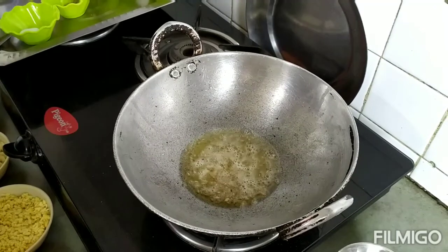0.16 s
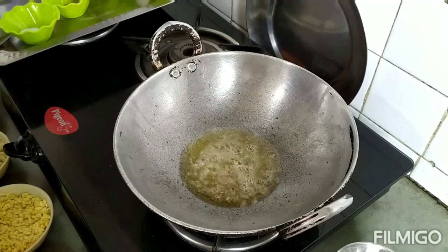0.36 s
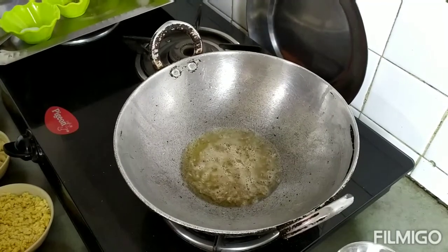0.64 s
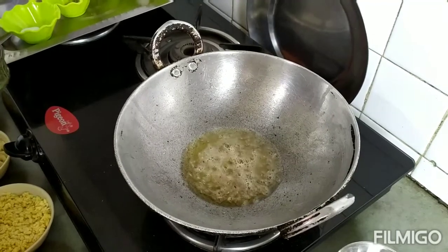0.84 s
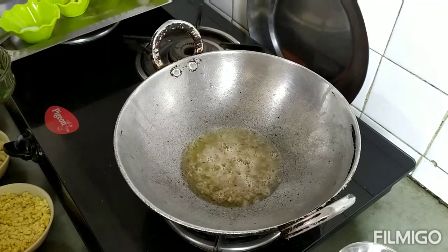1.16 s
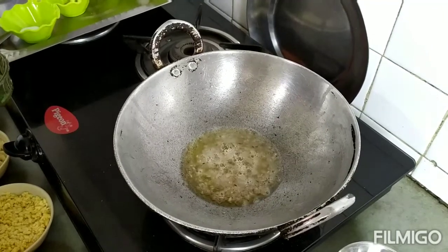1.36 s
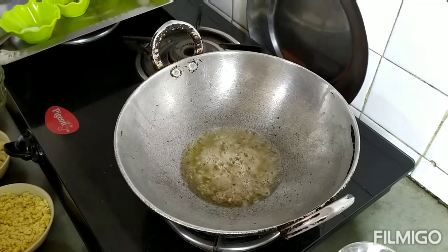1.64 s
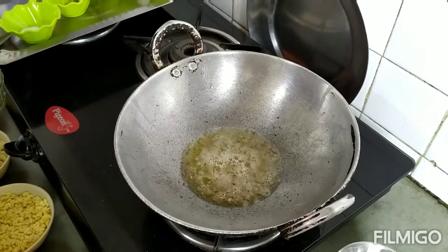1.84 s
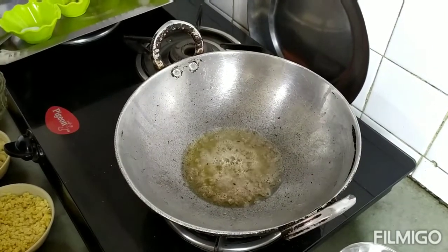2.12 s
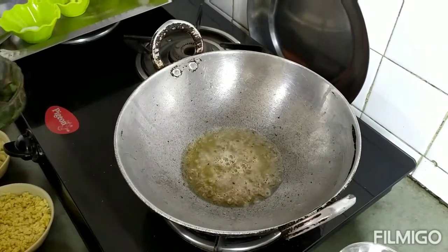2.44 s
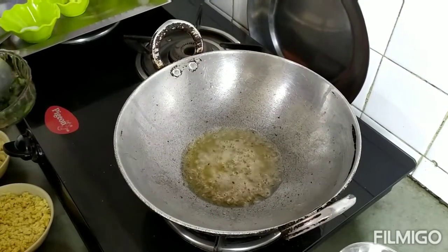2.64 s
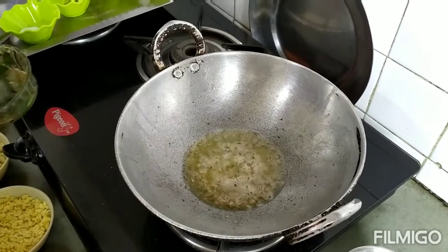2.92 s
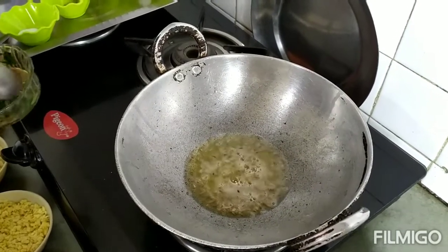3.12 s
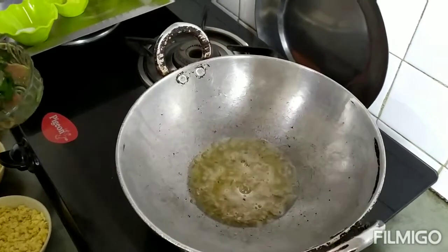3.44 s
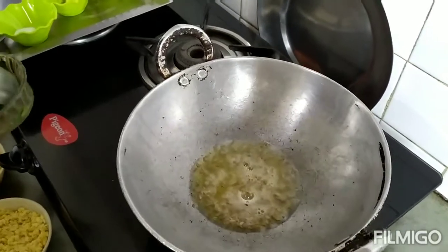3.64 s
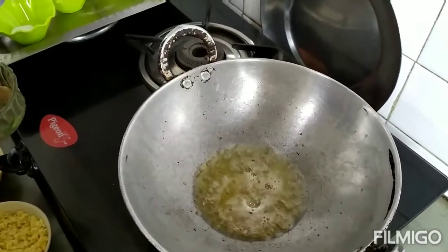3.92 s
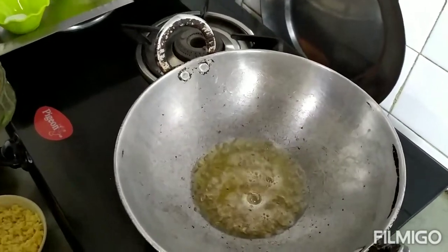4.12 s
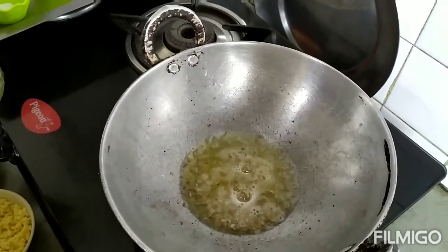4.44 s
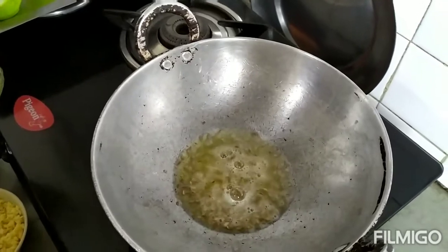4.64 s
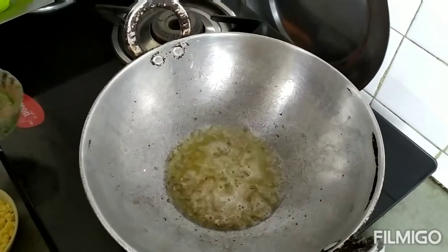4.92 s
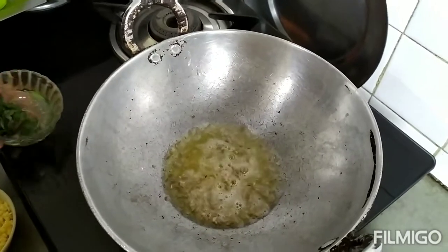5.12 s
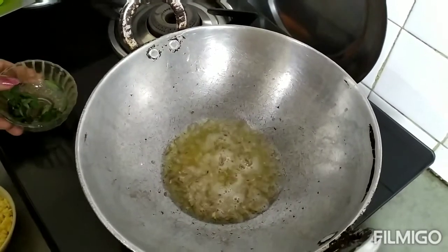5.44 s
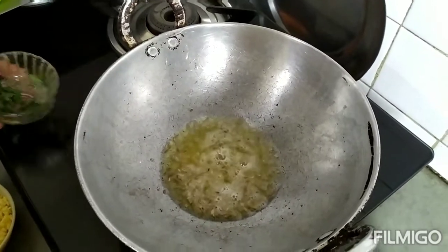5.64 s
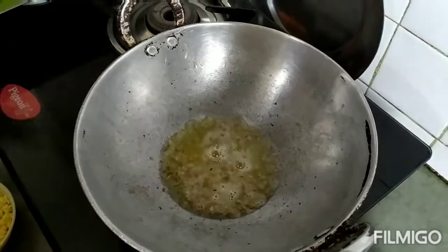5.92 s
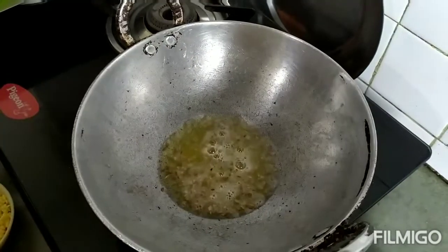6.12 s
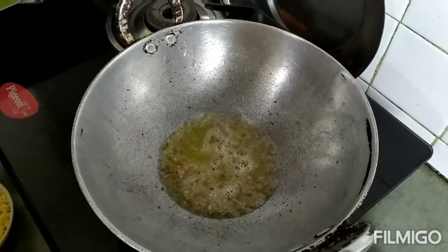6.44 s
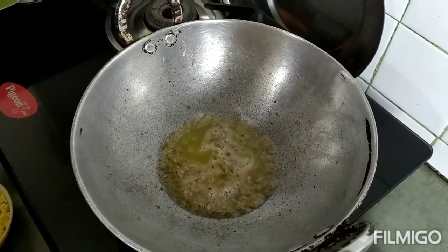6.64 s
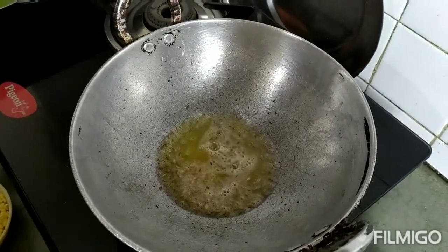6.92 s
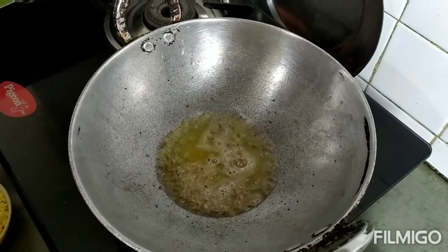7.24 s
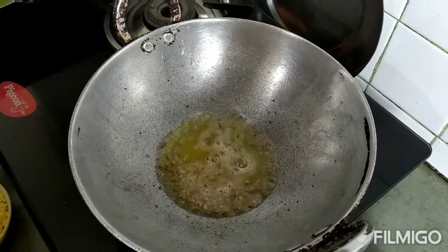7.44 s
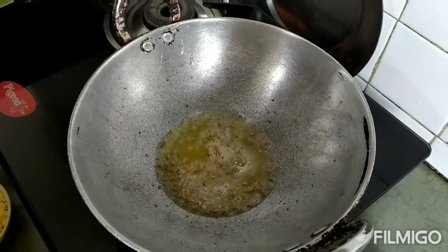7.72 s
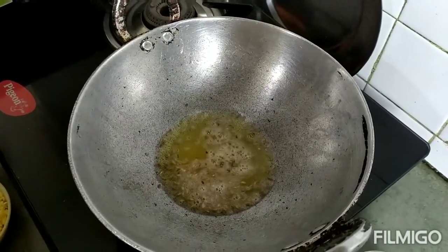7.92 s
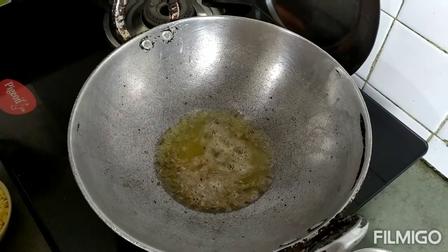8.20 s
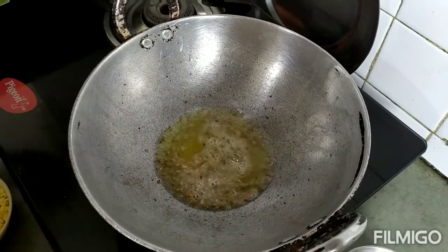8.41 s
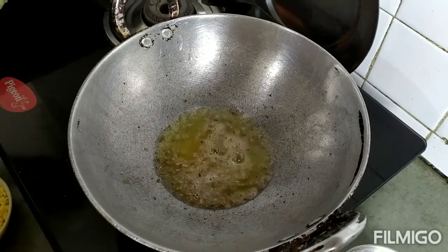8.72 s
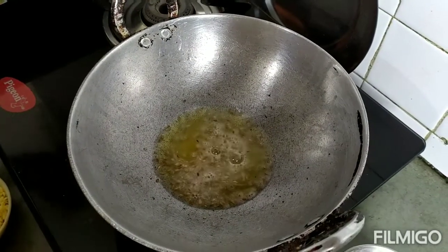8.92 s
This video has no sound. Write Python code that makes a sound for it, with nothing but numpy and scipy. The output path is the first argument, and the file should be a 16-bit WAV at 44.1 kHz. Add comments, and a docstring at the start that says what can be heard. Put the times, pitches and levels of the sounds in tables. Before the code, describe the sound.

A fine, high fizz of hot oil in a metal wok runs for about nine seconds, heard from just above the pan in a tiled kitchen, over the low drone of a gas burner. Mustard seeds burst in sharp, irregular pops with a slight metallic ring, among faint crackles and spitting droplets. The strongest pops come near 1.9, 3.8, 4.3, 5.0, 6.7, 8.2 and 8.7 seconds, the loudest at 5.4. Between 2.9 and 4.7 seconds a glass bowl gives several short, damped clinks as it is picked up, clearest at 3.3, 4.1 and 4.7. Coarser bubbling builds at around 4 seconds. From 6.6 to 7 seconds a drawer further off scrapes and runs into its stop. A faint, breathy steam whistle follows from 7.8 to about 8.5 seconds. Soft dull knocks and finger rubs occur close to the microphone, mostly after 3.4 seconds.

```python
"""A fine fizz of hot oil, broken by sharp pops: mustard seeds fry in a metal wok in a tiled kitchen.
Each husk that tears is an impulse exciting the air and metal of the wok; the fizz is the sum of
countless collapsing bubbles, and one seed whistles with steam. A glass bowl clinks in its damped
modes as it is picked up, and a drawer is pulled further off. Close by there are dull knocks and
fingers rub on a hand-held case; under it all lies the low drone of the gas burner."""
import sys
import numpy as np
from scipy import signal
from scipy.fft import rfft, irfft, next_fast_len
from scipy.io import wavfile

SR = 44100
rng = np.random.default_rng(int(sys.argv[2]) if len(sys.argv) > 2 else 0)


def wav_record(signal):
    """Record a signal, one row per channel, as 16-bit PCM in the file named by sys.argv[1]."""
    frames = np.transpose(np.atleast_2d(signal))
    bounded = np.clip(frames, -1, 1)
    # unit amplitude maps onto the largest positive 16-bit level
    quanta = np.round(bounded * 32767).astype(np.int16)
    wavfile.write(sys.argv[1], SR, quanta)


N = 399987
TIME = np.arange(N) / SR
AGE = TIME[:SR * 3 // 5]   # t/s since an excitation


# bursting seeds: t/s, relative level/dB, snap f/Hz, relative cavity level/dB, relative crack level/dB,
# left-right/dB, wok ring re pop/dB, snap tilt/(dB per octave)
SEED_BURSTS = [(0.0726, -40.5, 3050, -21, -15, 3, -19, 4), (1.091, -49.5, 3200, -47, -16, -6, -38, 5),
               (1.9449, -19, 3280, -29.5, -18, -1, -22.5, 1),
               (2.177, -32.5, 2960, -23, -14, -2.5, -10.5, 3.5), (2.838, -46, 2980, -11.5, -20, -7, -8, 9),
               (2.858, -47.5, 2780, -10, -23, -2, 2, 7), (2.879, -51.5, 2350, -19, -12, -1, -6, 7),
               (2.907, -51.5, 2520, -10, -12, -7, -13, 9), (3.7488, -46, 2900, -18, -18, -4, -5, -12),
               (3.8103, -22.5, 2480, -35.5, -12.5, -0.5, -26, -1.5),
               (4.2959, -21, 2650, -17, -15.5, 0.5, -9, 0.5), (4.4896, -32.5, 2540, -22, -14, -1, -11, 5),
               (4.9946, -21, 3340, -30, -14, 2, -26, 2), (5.3988, -10, 3015, -27, -18, 5, -19, 3.5),
               (5.639, -29.5, 3200, -26.5, -18.5, 6, -18, 2), (6.745, -17, 3200, -33, -19.5, 0.5, -16.5, 4),
               (7.5194, -36.5, 3200, -23.5, -13, 1, -5, 3), (7.5677, -36, 2760, -23.5, -32, 5, -8.5, 2.5),
               (8.205, -18, 2900, -18, -19.5, 1.5, -13, 0), (8.693, -23.5, 3000, -22, -25, 2, -17, -1.5)]
# modes of the snap: ratio to snap f, bandwidth/Hz, level/dB
SNAP_MODES = [(0.559, 380, -9), (0.816, 380, -0.5), (1.001, 350, 0), (1.22, 450, 1), (1.5, 650, -1.5)]
# modes of the air in the wok: f/Hz, bandwidth/Hz, level/dB
CAVITY_MODES = [(820, 120, -7), (998, 270, 19.5), (1540, 160, 5)]
# modes of the cracking husk: f/Hz, bandwidth/Hz, level/dB
CRACK_MODES = [(5480, 2600, 3), (8700, 3800, -1.5), (11400, 2000, -15)]

def seed_pops(gain_db, cavity_gain_db, crack_gain_db, tear_s):
    """Impulse excitation: a husk tears with a snap and a crack, and the wok's air and metal resonate."""
    out = np.zeros((2, N))
    opening = 1 - np.exp(-(AGE[:SR // 20] / tear_s) ** 2)
    for s, db, hz, cavity_db, crack_db, pan_db, wok_db, tilt_db in SEED_BURSTS:
        modes = [(ratio * hz, width, mode_db + tilt_db * np.log2(ratio))
                 for ratio, width, mode_db in SNAP_MODES]
        snap = unit_energy(band(opening * struck(modes, scatter_db=1.5), 1450, 5300))
        cavity = unit_energy(band(struck(CAVITY_MODES, scatter_db=2.0), 720, 2600)) * panned(-2.5)
        crack = unit_energy(band(struck(CRACK_MODES, scatter_db=2.5), 3300, 12000)) * panned(-4.0)
        crack = np.roll(crack, int(tear_s * SR), axis=1)
        pop = snap * panned(pan_db) + from_db(cavity_db + cavity_gain_db) * cavity
        pop += from_db(crack_db + crack_gain_db) * crack
        pop[0] = np.roll(pop[0], 3)   # the sound reaches the left a little later
        add(out, s, from_db(db + gain_db) * in_kitchen(reflected(pop), near_db=-6.5, room_db=-0.85))
        add(out, s, from_db(db + gain_db + wok_db) * wok_ring())
    return out


# modes of the wok's metal: f/Hz, level/dB, T60/s
WOK_MODES = [(964, -3.5, 0.25), (1005, -1, 0.25), (1076, -3, 0.32), (1155, -2.5, .27), (1750, -9.5, .2),
             (2030, -8.5, 0.26), (2400, -5.5, 0.2), (2570, 2, 0.26), (2600, -1.5, 0.26), (2900, -1, .25),
             (3090, 0, 0.21), (3225, 1, 0.3), (3450, -3, 0.28), (3950, -4, 0.23), (4600, -6.5, .26)]

def wok_ring():
    """Modal superposition: each pop excites the metal's modes with strengths of its own; energy 1."""
    hz, db, t60 = np.transpose(WOK_MODES)[:, :, None]
    waves = from_db(db - 60 * AGE / t60) * np.sin(2 * np.pi * hz * AGE)
    return unit_energy(rng.standard_normal((2, len(WOK_MODES))) @ waves)


# first echoes of a pop: mean delay/s, level re direct sound/dB
EARLY_ECHOES = [(0.0013, -7.5), (0.0023, -10), (0.0074, -16)]

def reflected(sound):
    """Early reflections: their path lengths differ with the place of the seed."""
    response = np.zeros((2, SR // 20))
    response[:, 0] = 1
    for delay_s, db in EARLY_ECHOES:
        delays = (delay_s * SR * rng.uniform(.85, 1.15, 2)).astype(int)
        response[[0, 1], delays] += from_db(db)
    return signal.fftconvolve(sound, unit_energy(response), axes=1)


# coarse bubbling, growing as the oil heats and the listener comes closer: t/s, level/dB
VIGOUR_CURVE = [(0, -78), (1.7, -77.5), (3.7, -67.5), (4.4, -59.5), (5.4, -61), (6.0, -64.5), (7.5, -65),
                (8.3, -62), (9.07, -63)]
# spectra of fine fizz and coarse bubbling: f/Hz, spectral density level/dB
FIZZ_SPECTRUM = [(2800, -23), (3300, -9), (4300, -2.5), (5300, -11.5), (5950, -1.5), (6470, -0.5),
                 (7600, 0.5), (8300, 4), (9780, 4.5), (11400, 0.5), (13000, -1), (13500, -18),
                 (14300, -20.5), (15000, -31.5)]
BUBBLING_SPECTRUM = [(2350, -28), (2550, -14.5), (2800, -8), (3100, -2.5), (3900, -2), (5000, -3),
                     (6000, -8.5), (9000, -33)]

def frying(mean_fizz_db, fizz_follows, fizz_pan_db, bubbling_pan_db):
    """Incoherent sources add: bubbles collapse in patches of foam, as fine fizz and coarse bubbling."""
    bubbling_db = in_time(VIGOUR_CURVE)
    fizz_db = mean_fizz_db + fizz_follows * (bubbling_db - bubbling_db.mean())
    fizz = click_rain(FIZZ_SPECTRUM, per_s=12000, spread_db=2.35, flutter_db=2.5, patches=6)
    bubbling = click_rain(BUBBLING_SPECTRUM, per_s=2500, spread_db=3.1, flutter_db=5, patches=4)
    return (from_db(fizz_db) * panned(fizz_pan_db) * fizz
            + from_db(bubbling_db) * panned(bubbling_pan_db) * bubbling)


def click_rain(spectrum, per_s, spread_db, flutter_db, patches):
    """Shot noise: dense, uneven clicks from several patches, each with its own flutter and echoes."""
    sizes = from_db(spread_db * np.minimum(rng.exponential(1, (2, N)), 5))
    onsets = rng.random((2, N)) < per_s / SR
    clicks = stereo(onsets * sizes * rng.choice([-1, 1], (2, N)), side_db=-1.5)
    patch = rng.integers(0, patches, N)
    out = np.zeros((2, N))
    for k in range(patches):
        echoes = 1.2 * unit_energy(noise(SR // 50) * np.exp(-AGE[:SR // 50] / 0.0034))
        echoes[:, 0] += 1
        fluttering = clicks * (patch == k) * surge(per_s=22, depth_db=flutter_db)
        out += signal.oaconvolve(fluttering, echoes, axes=1)[:, :N]
    return coloured(out, spectrum)


# spitting droplets: t/s, relative level/dB, left-right/dB
DROPLET_BURSTS = [(1.018, -44, 0), (1.073, -42, -9), (3.7497, -35, -5), (3.9715, -40, -2), (4.842, -53, 1),
                  (5.582, -43, -12), (5.843, -44, -8), (6.126, -38.5, 2), (6.8327, -27.5, -9),
                  (7.64, -52, 1)]
# modes of a thin tick, for droplets and husks: f/Hz, bandwidth/Hz, level/dB
TICK_MODES = [(4200, 2500, -8), (8500, 3000, -1), (12000, 2500, -2)]

def droplet_spits(gain_db):
    """Impulses in a reverberant field: water bursts out of the oil, heard largely through echoes."""
    out = np.zeros((2, N))
    for s, db, pan_db in DROPLET_BURSTS:
        tick = unit_peak(band(struck(TICK_MODES, scatter_db=2.0), 4000, 14000))
        tick *= from_db(db + gain_db) * panned(pan_db)
        add(out, s, in_kitchen(tick, near_db=4, room_db=6.0))
    return out


def husk_crackle(per_s, gain_db, spread_db, follows):
    """A random impulse train: husks that only crack tick faintly, more strongly as the oil heats."""
    out = np.zeros((2, N))
    for when, weakness, pitch, side in rng.random((int(per_s * N / SR), 4)):
        tick = struck(np.array(TICK_MODES) * [.7 + .4 * pitch, .5, 1], scatter_db=2.0)
        add(out, when * N / SR, from_db(gain_db - spread_db * weakness) * panned(8 * side - 6) * tick)
    vigour_db = in_time(VIGOUR_CURVE)
    out *= from_db(follows * (vigour_db - vigour_db.max()))
    return in_kitchen(band(out, 3200, 12500, order=5), near_db=9.0, room_db=4.5)[:, :N]


# resonances of a leaking seed: f/Hz, bandwidth/Hz, level/dB
WHISTLE_MODES = [(3510, 12, 0), (3690, 30, -10), (3870, 40, -2.5), (4020, 30, -8)]

def steam_whistle(start_s, length_s, gain_db):
    """Noise-driven resonance: one jet of steam leaks from a seed with a faint, breathy whistle."""
    hz, width, db = np.transpose(WHISTLE_MODES)[:, :, None]
    resonances = from_db(db) * unit_energy(np.exp(-np.pi * width * AGE) * np.cos(2 * np.pi * hz * AGE))
    tones = signal.fftconvolve(noise(), unit_energy(resonances.sum(axis=0))[None], axes=1)
    jet = envelope(start_s, length_s, attack_s=0.26, fade_db_per_s=36)
    return from_db(gain_db) * jet * band(tones[:, :N], 2900, 4630)


# contacts with the bowl: t/s, relative level/dB, tilt/(dB per octave), chatter time/s,
# first and second f/Hz favoured by the place of contact, their boost/dB, free ring/dB
BOWL_CONTACTS = [(2.882, -44.5, 3.5, 0.0085, 2570, 6300, 16, 0), (3.303, -24, 0, 0.007, 2570, 4000, 4, -12),
                 (3.352, -39, 5, 0.009, 11000, 13000, 5, -6), (3.469, -51, -0.5, 0.006, 2570, 6470, 21, 11),
                 (4.141, -21, 3, 0.005, 6300, 12620, 4.5, -4),
                 (4.681, -26.5, 1.5, 0.0082, 4270, 12770, 9.5, -7)]
# modes of the glass: f/Hz, hand-damped bandwidth/Hz, damped level/dB, free level/dB
GLASS_MODES = [(1700, 240, -12, -39), (2523, 90, 0, -9.5), (2650, 130, -2, -11), (3370, 320, -10, -17),
               (3650, 280, -12, -28), (4000, 300, -6, -31), (6135, 170, -5.5, -17.5),
               (6300, 200, -1.5, -18.5), (6410, 170, -1, -10), (7700, 400, -20.5, -25.5),
               (8440, 260, -7, -20.5), (8930, 300, -7.5, -18), (10300, 300, -10, -17),
               (10920, 260, -0.5, -23), (12100, 150, -9, -28), (12620, 100, -5.5, -26),
               (13500, 120, -2, -24), (14440, 220, -7, -25), (15650, 260, -21, -38)]
# rattle of the contacts: f/Hz, spectral density level/dB
RATTLE_SPECTRUM = [(1100, -11.5), (2400, -2), (3800, 3.5), (4900, -9), (6200, 2), (9000, 0.5), (13500, 2),
                   (14600, -9), (15500, -26)]

def bowl_clinks(gain_db, free_gain_db, t60_at_6khz_s, rattle_db, pan_db, treble_pan_db):
    """Modal damping: the hand stops most of the chattering bowl's ring; a little sings on unsteadily."""
    out = np.zeros((2, N))
    hz, width, damped_db, sustain_db = np.transpose(GLASS_MODES)[:, :, None]
    octaves = np.log2(hz / 6000)
    t60 = t60_at_6khz_s * 2 ** (-0.87 * octaves)   # higher modes die sooner
    damped = unit_energy(np.exp(-np.pi * width * AGE))
    sustained = from_db(sustain_db + free_gain_db) * unit_energy(from_db(-60 * AGE / t60))
    sides = from_db(np.array([1, -1])[:, None, None] * (pan_db + treble_pan_db * octaves) / 2)
    for s, db, tilt_db, chatter_s, first_hz, second_hz, boost_db, free_db in BOWL_CONTACTS:
        chatter = np.exp(-(AGE[:SR // 50] / chatter_s) ** 2)[None]   # contacts draw out the attack
        swell = unit_energy(signal.fftconvolve(damped, chatter, axes=1)[:, :len(AGE)])
        free = from_db(free_db) * sustained * (1 - np.exp(-AGE / chatter_s))
        favoured = np.exp(-((hz - first_hz) / 300) ** 2) + np.exp(-((hz - second_hz) / 300) ** 2)
        decay = (from_db(damped_db) * swell + free) * from_db(tilt_db * octaves + boost_db * favoured)
        unsteady = np.array([surge(160, 3.5, len(AGE)) * surge(28, 3, len(AGE)) for _ in GLASS_MODES])
        waves = np.sin(2 * np.pi * (hz * AGE + rng.random((2, len(GLASS_MODES), 1))))
        ring = np.sum(sides * unsteady * decay * waves, axis=1)
        ring /= np.sqrt(np.sum(ring ** 2) / 2)
        rattle = unit_energy(coloured(noise(len(AGE)), RATTLE_SPECTRUM) * swell[0])
        clink = ring + from_db(rattle_db) * rattle * panned(pan_db)
        add(out, s - .002, from_db(db + gain_db) * in_kitchen(clink, near_db=-2.0, room_db=1.0))
    return out


# short scrapes of the drawer: t/s, relative level/dB, duration/s
DRAWER_STROKES = [(6.593, -26, 0.033), (6.922, -34.5, 0.024), (6.939, -27, 0.047)]
# their spectrum: f/Hz, spectral density level/dB
SCRAPE_SPECTRUM = [(120, -46), (200, -30), (252, -5), (306, -18), (360, -3), (541, -20), (646, 4),
                   (922, -3.5), (1140, 0), (1460, -14.5), (1950, 0.5), (4180, -4), (6290, -16),
                   (9640, -13.5), (14000, -31.5)]

def drawer_scrapes(gain_db, room_db):
    """Sliding friction: a drawer further off scrapes roughly, heard mostly as reverberation."""
    out = np.zeros((2, N))
    for s, db, length in DRAWER_STROKES:
        stroke = np.clip(AGE / 0.0032, 0, 1) * np.exp(-(AGE / length) ** 4)
        friction = coloured(stereo(noise(len(AGE)), side_db=-4.0), SCRAPE_SPECTRUM)
        scrape = friction * stroke * surge(per_s=310, depth_db=2.5, size=len(AGE))
        add(out, s, from_db(db + gain_db) * in_kitchen(scrape, near_db=2, room_db=room_db))
    return out


# hollow body of the drawer: f/Hz, spectral density level/dB
DRAWER_SPECTRUM = [(280, -12.5), (350, -17), (440, -7), (560, -13), (650, -0.5), (800, -1), (950, -13),
                   (1200, -17.5), (1700, -9.5)]

def drawer_slide(pull_s, pull_db, coast_db_per_s, stop_s, stop_db):
    """Forced vibration: the jerked drawer hums, coasts ever more quietly and runs into its stop."""
    edges = dict(attack_s=0.033, fade_db_per_s=179)
    coasting = from_db(pull_db - coast_db_per_s * np.maximum(TIME - pull_s, 0))
    run = coasting * envelope(pull_s, stop_s - pull_s, **edges)
    stop = from_db(stop_db) * envelope(stop_s, length_s=0.067, **edges)
    return (run + stop) * coloured(stereo(noise(), side_db=-8.5), DRAWER_SPECTRUM)


# dull knocks: t/s, relative level/dB, nominal f/Hz, thump re knock/dB, scuff re knock/dB
DULL_KNOCKS = [(0.282, -61, 400, -10, -27), (3.44, -55, 433, -6, -24), (4.68, -50, 407, -6, 11),
               (5.028, -47.5, 400, -12, -11), (5.562, -40.5, 445, 0.5, 3), (6.337, -44.5, 420, -6, -12),
               (7.355, -54, 450, -17, -7), (7.732, -53.5, 444, -5, -15), (7.785, -52, 523, -15, -12),
               (7.918, -48, 340, -14, -23), (8.105, -47, 463, -7, -16), (8.399, -49.5, 425, -10, -26),
               (8.831, -49.5, 340, -7, -17)]
# modes of the knock: ratio to nominal f, bandwidth/Hz, level/dB
KNOCK_MODES = [(0.7, 380, -4), (1.2, 418, -6)]
# modes of the low thump: f/Hz, bandwidth/Hz, level/dB
THUMP_MODES = [(76, 27, 4), (149, 100, -6.5)]
# scuff of the contact: f/Hz, spectral density level/dB
SCUFF_SPECTRUM = [(200, 6), (500, 2), (1000, -5), (1800, -20), (2600, -6)]

def dull_knocks(gain_db, soft_s, scuff_s):
    """Soft impact: dull knocks close by, with a low thump and a scuff, one under a bowl clink."""
    out = np.zeros((2, N))
    age = AGE[:SR // 20]
    contact = 1 - np.exp(-(age / soft_s) ** 2)
    for s, db, hz, thump_db, scuff_db in DULL_KNOCKS:
        modes = np.array(KNOCK_MODES) * [hz, 1, 1]
        knock = unit_peak(band(contact * struck(modes, scatter_db=3.5), 100, 1.6 * hz))
        thump = unit_peak(band(struck(THUMP_MODES, scatter_db=1.0), 30, 250))
        friction = coloured(stereo(noise(len(age)), side_db=-14.5), SCUFF_SPECTRUM)
        scuff = unit_peak(contact * np.exp(-age / scuff_s) * friction)
        impact = knock + from_db(thump_db) * thump + from_db(scuff_db) * scuff
        add(out, s + 0.0016, from_db(db + gain_db) * in_kitchen(impact, near_db=-3, room_db=-11))
    return out


# shifts of the grip: t/s, duration/s, level/dB
GRIP_SHIFTS = [(0.038, 0.3, -83), (3.421, 0.27, -70), (3.7, 0.22, -68.5), (4.166, 0.19, -73),
               (4.42, 0.16, -74.5), (5.195, 0.26, -76), (5.515, 0.07, -75), (7.25, 0.32, -82.5),
               (7.726, 0.083, -72.5)]
# skin rubbing on the case: f/Hz, spectral density level/dB
RUB_SPECTRUM = [(150, -1.5), (280, -4), (480, -5.5), (700, -14.5), (1000, -23), (1500, -32.5)]

def finger_rubs(slips_per_s, uneven_db, case_db):
    """Friction noise: skin slips in short, dull, uneven rubs, and the case rumbles with them."""
    pressure = sum(from_db(db) * envelope(s, length) for s, length, db in GRIP_SHIFTS)
    rub = coloured(stereo(noise(), side_db=-3.5), RUB_SPECTRUM)
    case = band(stereo(noise(), side_db=-1), 34.55, 183.0)
    return pressure * (surge(slips_per_s, uneven_db) * rub + from_db(case_db) * case / case.std())


# swells of hiss: t/s, duration/s, level/dB
HISS_SWELLS = [(2.813, 0.08, -62), (5.301, 0.015, -55), (6.088, 0.14, -62.5)]
# their spectrum: f/Hz, spectral density level/dB
HISS_SPECTRUM = [(600, -5), (1500, -9), (2500, 3), (3800, 0), (6000, -9.5), (12000, -14), (15000, -15)]

def hiss_swells(attack_s, fade_db_per_s):
    """Amplitude-modulated shot noise: brief, soft swells of broad hiss."""
    swells = sum(from_db(db) * envelope(s, length, attack_s, fade_db_per_s)
                 for s, length, db in HISS_SWELLS)
    return swells * click_rain(HISS_SPECTRUM, per_s=2100, spread_db=3.5, flutter_db=-0.5, patches=2)


# faint ticks: t/s, relative level/dB, f/Hz
FAINT_TICKS = [(0.165, -67, 1140), (2.47, -59.5, 1920), (2.591, -67, 930), (3.02, -70, 980),
               (5.32, -47.5, 990), (6.0, -62.5, 1030), (7.361, -62.5, 1150), (8.606, -58.5, 1250)]

def faint_ticks(gain_db, width_hz):
    """Heavily damped resonance: faint, dull, mid-pitched ticks."""
    out = np.zeros((2, N))
    for s, db, hz in FAINT_TICKS:
        modes = [(hz, width_hz, 0), (1.5 * hz, width_hz, -5)]
        tick = unit_peak(band(struck(modes, scatter_db=2.0), .7 * hz, 1.7 * hz))
        add(out, s, from_db(db + gain_db) * in_kitchen(tick, near_db=8, room_db=1.5))
    return out


def light_scrape(start_s, length_s, hz, level_db, grain_db):
    """Modulated narrow-band noise: something drags lightly nearby with a thin, uneven ring."""
    pressure = envelope(start_s, length_s) * surge(per_s=60, depth_db=grain_db)
    ring = band(stereo(noise(), side_db=-6), .94 * hz, 1.06 * hz)
    return from_db(level_db) * pressure * ring / ring.std()


# course of the burner's drone: t/s, level/dB
DRONE_CURVE = [(0, -61.5), (3.0, -60), (5.5, -57.5), (7.0, -57), (7.8, -64.5), (8.6, -63.5), (9.07, -56)]
# spectra of its drone and rumble: f/Hz, spectral density level/dB
DRONE_SPECTRUM = [(20, -54), (36, -22.5), (48, -23), (66, -17), (72, -7.5), (76, -3.5), (81, -6.5),
                  (92, -27), (115, -21.5), (160, -48)]
RUMBLE_SPECTRUM = [(90, 0), (115, -0.5), (150, 5.5), (200, -9), (260, -14.5), (340, -30.5), (450, -36)]

def burner(rumble_db):
    """Combustion noise: the gas flame gives a narrow low drone and a soft rumble above it."""
    drone = coloured(stereo(noise(), side_db=-15.5), DRONE_SPECTRUM)
    rumble = coloured(stereo(noise(), side_db=-9.5), RUMBLE_SPECTRUM)
    return from_db(in_time(DRONE_CURVE)) * drone + from_db(rumble_db) * rumble


# reverberation of the kitchen: f/Hz, T60/s, tail level/dB
KITCHEN_DECAY = [(304, 0.39, -4.5), (800, 0.2, -7), (1750, 0.34, -0.5), (2478, 0.39, -6.5),
                 (3200, 0.46, -4), (4700, 0.38, -2), (6640, 0.25, -4.5), (13300, 0.28, -7.5)]

def kitchen_tail():
    """Reverberation: grainy echoes from the tiles decay exponentially, each octave at its own rate."""
    edges = np.geomspace(125, 16000, 8)
    grains = rng.standard_normal((2, 2, len(AGE))) * surge(per_s=450, depth_db=3.5, size=len(AGE))
    grains /= grains.std()
    build_up = 1 - np.exp(-AGE / 0.0055)
    tail = np.zeros((2, len(AGE)))
    for k, (low, high) in enumerate(zip(edges, edges[1:])):
        hz = np.sqrt(low * high)
        decay = unit_energy(from_db(-60 * AGE / at_hz(KITCHEN_DECAY, hz)) * build_up)
        tail += band(grains[k % 2], low, high) * decay * from_db(at_hz(KITCHEN_DECAY, hz, column=2))
    return tail


def in_kitchen(sound, near_db, room_db):
    """Convolution with an impulse response: direct sound, echoes from wok and hob, then the room."""
    near = unit_energy(noise(len(AGE)) * np.exp(-AGE / 0.0087) * (AGE > .0012))
    response = from_db(near_db) * near + from_db(room_db) * kitchen_tail()
    response[:, 0] += 1
    return signal.fftconvolve(sound, response, axes=1)


def struck(modes, scatter_db):
    """Impulse response of damped modes, a little different in each channel; energy 1."""
    hz, width, db = np.transpose(modes)[:, :, None]
    detune, scatter = rng.standard_normal((2, 2, len(modes), 1))
    age = AGE[:SR // 20]
    tones = np.sin(2 * np.pi * hz * (1 + 0.025 * detune) * age)
    waves = unit_energy(np.exp(-np.pi * width * age) * tones)
    signs = (-1) ** np.arange(len(modes))[:, None]
    return unit_energy(np.sum(waves * signs * from_db(db + scatter_db * scatter), axis=1))


def coloured(x, spectrum):
    """Spectral shaping, with a steep roll-off beyond the ends of the spectrum; rms 1."""
    size = next_fast_len(x.shape[1])
    hz = np.arange(size // 2 + 1) * SR / size
    inside = np.minimum(hz / spectrum[0][0], 1) * np.minimum(spectrum[-1][0] / (hz + 1), 1)
    y = irfft(rfft(x, size) * from_db(at_hz(spectrum, hz)) * inside ** 6, size)[:, :x.shape[1]]
    return y / np.sqrt(np.mean(y ** 2))


def band(x, low_hz, high_hz, order=2):
    """Band-pass filtering with a maximally flat passband."""
    sections = signal.butter(order, [low_hz, min(high_hz, .45 * SR)], "band", fs=SR, output="sos")
    return signal.sosfilt(sections, x)


def surge(per_s, depth_db, size=N):
    """Random amplitude modulation: a gain that wanders."""
    knots = np.arange(0, size / SR + 1, 1 / per_s)
    swings = np.clip(rng.standard_normal(len(knots)), -2, 1.5)
    return from_db(depth_db * np.interp(TIME[:size], knots, swings))


def envelope(start_s, length_s, attack_s=0.019, fade_db_per_s=258.5):
    """Linear rise, hold until length_s has passed, then exponential decay; by default a short rub."""
    age = TIME - start_s
    return np.clip(age / attack_s, 0, 1) * from_db(-fade_db_per_s * np.maximum(age - length_s, 0))


def noise(size=N):
    """Two channels of uncorrelated white noise."""
    return rng.standard_normal((2, size))


def stereo(pair, side_db):
    """Mid-side mixing of two uncorrelated noises."""
    return pair[0] + from_db(side_db) * pair[1] * np.array([[1], [-1]])


def panned(pan_db):
    """Left and right gains for a level difference."""
    return from_db(np.array([[pan_db], [-pan_db]]) / 2)


def from_db(db):
    """Level to amplitude ratio."""
    return 10 ** (np.asarray(db) / 20)


def unit_energy(x):
    """Normalise each channel to energy 1."""
    return x / np.sqrt(np.sum(x ** 2, axis=-1, keepdims=True) + 1e-30)


def unit_peak(x):
    """Normalise to peak 1."""
    return x / np.abs(x).max()


def in_time(curve):
    """Interpolate a level curve at every sample."""
    return np.interp(TIME, *np.transpose(curve))


def at_hz(points, hz, column=1):
    """Interpolate one column on a log-frequency axis."""
    points = np.array(points)
    return np.interp(np.log(hz + 1), np.log(points[:, 0]), points[:, column])


def add(out, s, sound):
    """Superpose a stereo sound at time s."""
    start = max(round(s * SR), 0)
    out[:, start:start + sound.shape[1]] += sound[:, :N - start]


def scene():
    """Linear superposition of all sources, heard from just above the wok."""
    pops = seed_pops(gain_db=16.5, cavity_gain_db=8, crack_gain_db=7.8, tear_s=.00065)
    spits = droplet_spits(gain_db=2.0)
    husks = husk_crackle(per_s=24, gain_db=-41.5, spread_db=14, follows=.5)
    oil = frying(mean_fizz_db=-60, fizz_follows=0.034, fizz_pan_db=-5.0, bubbling_pan_db=7.5)
    hiss = hiss_swells(attack_s=0.0091, fade_db_per_s=151.5)
    steam = steam_whistle(start_s=7.764, length_s=0.62, gain_db=-55)
    ticks = faint_ticks(gain_db=-5.5, width_hz=380)
    bowl = bowl_clinks(gain_db=19, free_gain_db=-1, t60_at_6khz_s=0.38, rattle_db=-5,
                       pan_db=-1.5, treble_pan_db=-2.5)
    drawer = drawer_scrapes(gain_db=-12.0, room_db=8.5)
    drawer += drawer_slide(pull_s=6.594, pull_db=-46, coast_db_per_s=42, stop_s=6.922, stop_db=-41.5)
    knocks = dull_knocks(gain_db=-2.5, soft_s=0.00084, scuff_s=0.0035)
    rubs = finger_rubs(slips_per_s=70, uneven_db=5, case_db=10.0)
    scrape = light_scrape(start_s=8.8, length_s=0.17, hz=1650, level_db=-70, grain_db=3)
    wok = pops + spits + husks + oil + steam
    return wok + bowl + drawer + knocks + rubs + hiss + ticks + scrape + burner(rumble_db=-67)


def record(dry):
    """Band limiting: a steep elliptic low-pass cuts the treble above 15900 Hz."""
    return signal.sosfilt(signal.ellip(10, .1, 80, 15900, fs=SR, output="sos"), dry)


dry = scene()
out = record(dry)
wav_record(out)
```